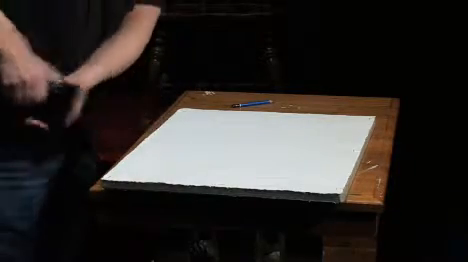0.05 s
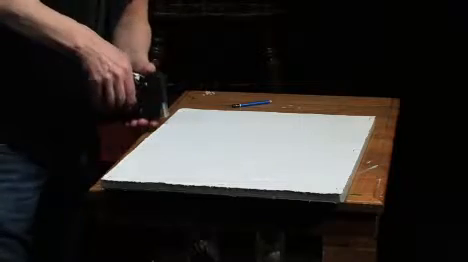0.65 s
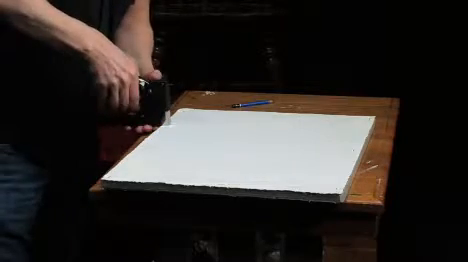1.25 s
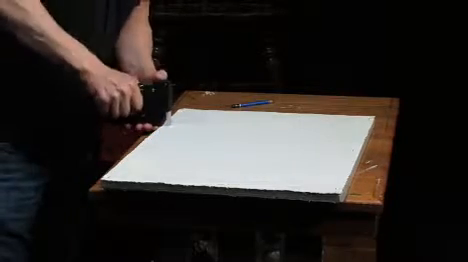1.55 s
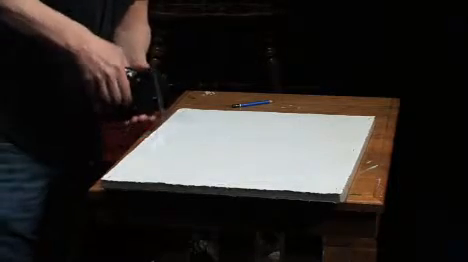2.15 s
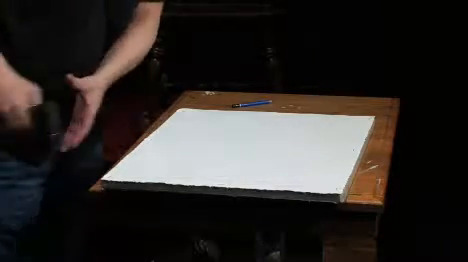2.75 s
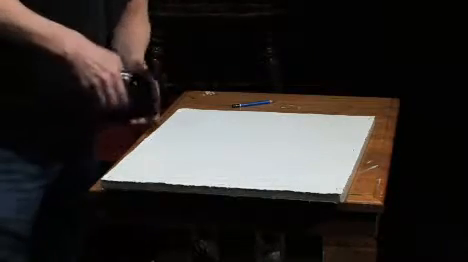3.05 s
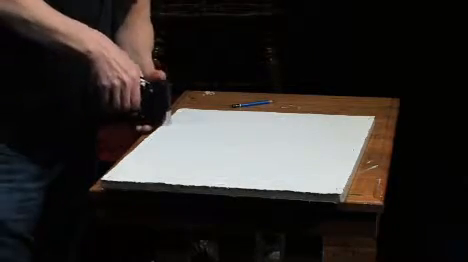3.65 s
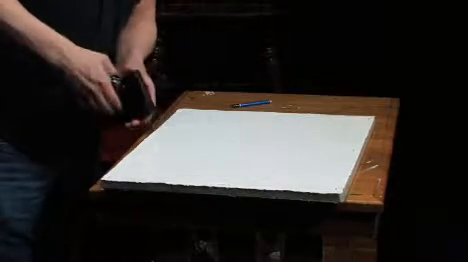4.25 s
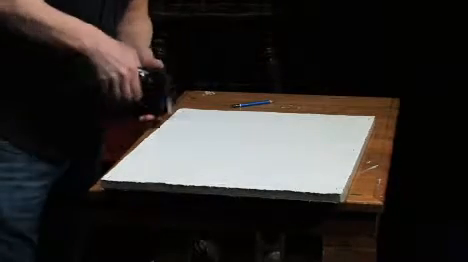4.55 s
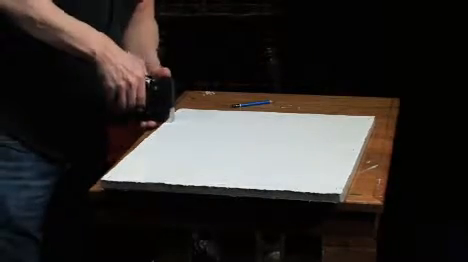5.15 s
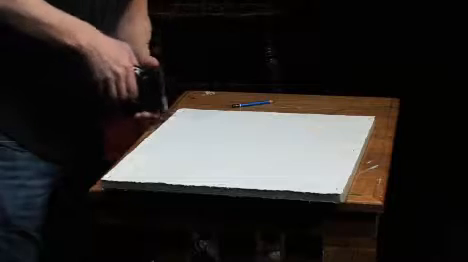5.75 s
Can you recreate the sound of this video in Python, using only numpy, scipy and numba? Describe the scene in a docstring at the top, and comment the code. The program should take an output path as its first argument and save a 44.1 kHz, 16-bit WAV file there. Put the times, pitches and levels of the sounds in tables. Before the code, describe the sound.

A hand staple gun fires five staples into a board with sharp metallic snaps, its lever clicking back after each, in a quiet room.

```python
"""A hand staple gun drives five staples through wet paper into a board on a wooden table.
A quiet, fairly live room hums and hisses. A faint hiss swells, then the catch slips with a click.
The spring slams the driver down, the steel frame rattles and the board and table knock.
A limiter ducks each snap, so the room's echo seems to swell up behind it.
Then the mechanism rebounds and the lever clicks back."""
import sys
import numpy as np
from scipy import signal
from scipy.fft import rfft, irfft
from scipy.io import wavfile
from numba import njit

SR = 44100
rng = np.random.default_rng(int(sys.argv[2]) if len(sys.argv) > 2 else 0)


def master_out(mix):
    """Clip the mix to full scale and print it as 16-bit PCM to the path in sys.argv[1]."""
    frames = np.transpose(np.atleast_2d(mix))
    ceiling = np.clip(frames, -1, 1)
    pcm = np.round(ceiling * 32767).astype(np.int16)
    wavfile.write(sys.argv[1], SR, pcm)


N = 255691
TOP_HZ, SHORT = 12000, 8192  # treble limit; samples in a short sound or filter


def undb(db):
    """Turn decibels into a number to multiply by."""
    return 10 ** (np.asarray(db) / 20)


def along(hz, points):
    """Read between (Hz, value) points, giving every octave the same width."""
    f, v = np.transpose(points)
    return np.interp(np.log(np.maximum(hz, 1)), np.log(f), v)


def add(track, s, x):
    """Mix x into the track, starting at s seconds."""
    i = int(s * SR)
    track[i:i + len(x)] += x[:len(track) - i]


def peak(s, rise_s, fall_s):
    """A loudness curve that grows to one at s seconds and dies away."""
    t = np.arange(N) / SR
    return np.exp(-np.maximum((s - t) / rise_s, (t - s) / fall_s))


def colour(x, points, tilt_db=0):
    """Give x a tone colour from (Hz, dB) points; a positive tilt, in dB per octave, brightens it."""
    hz = np.fft.rfftfreq(SHORT, 1 / SR)
    gain = undb(along(hz, points) + tilt_db * np.log2(np.clip(hz, 500, TOP_HZ) / 3000))
    gain /= np.sqrt(np.mean(gain ** 2 * (hz < TOP_HZ)))
    # build the filter so that nothing sounds before the hit that causes it
    cepstrum = irfft(np.log(gain))
    cepstrum[1:SHORT // 2] *= 2
    cepstrum[SHORT // 2 + 1:] = 0
    return signal.fftconvolve(x, irfft(np.exp(rfft(cepstrum))))[:len(x)]


def ring(x, modes):
    """Let x set fading notes ringing. Each note: pitch in Hz, seconds to fade 60 dB, share in dB."""
    t = np.arange(SHORT) / SR
    response = sum(undb(db) / np.sqrt(t60) * np.sin(2 * np.pi * hz * t) * np.exp(-np.log(1000) * t / t60)
                   for hz, t60, db in modes)
    return signal.fftconvolve(x, response / np.sqrt(np.sum(response ** 2)))[:len(x)]


def chatter(length_s, fall_s, rise_s):
    """Steel parts buzz against each other: dense tiny hits that last a while, then die away."""
    t = np.arange(SHORT) / SR
    fade = np.exp(-np.maximum(t - length_s, 0) / fall_s)
    impacts = rng.standard_normal(SHORT) * (1 - np.exp(-t / rise_s)) * fade
    return impacts * np.sqrt((length_s + fall_s / 2) * SR / np.sum(impacts ** 2))


# The tone of the room's air. Each row: frequency in Hz, relative level in dB.
AIR_COLOUR = [(20, -29.5), (40, -3), (58, 8), (80, -3), (150, 0), (210, -6.5), (280, -8), (450, -15),
              (1000, -21.5), (2000, -31), (4500, -37), (7200, -35), (10000, -42), (12000, -43)]

def room_tone(air_db=-56, hum_hz=58, hum_db=-62, swell_db=7.5):
    """Ventilation rumbles and hums under a thin hiss; it all swells with each squeeze, then sinks."""
    effort = sum(amount * peak(slip, rise_s=.5, fall_s=0.14) for slip, *_, amount in LEVER_SQUEEZES)
    hum = ring(rng.standard_normal(N), [(hum_hz, .45, 0), (156, .3, -4)])
    air = colour(rng.standard_normal(N), AIR_COLOUR)
    return undb(swell_db * effort) * (undb(air_db) * air + undb(hum_db) * hum)


# How long the echo lasts. Each row: frequency in Hz, seconds to fade by 60 dB.
ECHO_FADES = [(100, 0.43), (400, 0.45), (1500, 0.56), (4000, 0.45), (7500, 0.39), (12000, 0.31)]
# The tone of the echo. Each row: frequency in Hz, relative level in dB.
ECHO_COLOUR = [(60, -38), (300, -2), (1000, 1.5), (3000, 2), (5000, 4.5), (7200, 7.5), (9500, 6.5),
               (12000, 17.5)]

def room_echo(build_s=0.041, far_wall_s=0.071, far_wall_spread_s=0.0047, far_wall_share=0.25):
    """One second of echo: it builds up, swells as the far wall answers and fades, the treble first."""
    t = np.arange(SR) / SR
    hz = np.fft.rfftfreq(SR, 1 / SR)
    noise = rfft(rng.standard_normal(SR))
    centres, t60s = np.transpose(ECHO_FADES)
    tail = 0
    for share, t60 in zip(np.eye(len(centres)), t60s):
        band = irfft(noise * along(hz, np.c_[centres, share]), SR)
        tail = tail + band * np.exp(-np.log(1000) * t / t60)
    far_wall = far_wall_share * np.exp(-((t - far_wall_s) / far_wall_spread_s) ** 2)
    tail *= 1 - np.exp(-t / build_s) + far_wall
    # reflections arrive in uneven clumps a few milliseconds long
    tail *= undb(1.8 * np.interp(t, np.linspace(0, 1, 300), rng.standard_normal(300)))
    return colour(tail / np.sqrt(np.sum(tail ** 2)), ECHO_COLOUR)


# The spring sliding. Each row: loudest moment in seconds, spread in seconds, pitch in Hz, level in dB.
SPRING_SLIDES = [(4.31, 0.052, 6700, -65), (4.93, 0.053, 7220, -74)]

def faint_hisses(hiss_db=-57, lead_s=0.0036):
    """A faint hiss swells just before each catch click and dies quickly; the sliding spring hisses too."""
    swells = sum(peak(slip - lead_s, rise_s=0.045, fall_s=0.021) for slip, *_ in LEVER_SQUEEZES)
    out = undb(hiss_db) * swells * colour(rng.standard_normal(N), CRACK_COLOUR, tilt_db=-1.5)
    for s, spread, hz, db in SPRING_SLIDES:
        slide = np.exp(-((np.arange(N) / SR - s) / spread) ** 2 / 2)
        out += undb(db) * slide * ring(rng.standard_normal(N), [(hz, .003, 0)])
    return out


# The tone of a small click. Each row: frequency in Hz, relative level in dB.
CLICK_COLOUR = [(100, 20), (450, 0.5), (800, 5.5), (1400, 2.5), (2100, 5), (2600, -0.5), (3200, 3),
                (4300, -1.5), (6000, -0.5), (7400, 0), (9500, -4.5), (12000, -15.5)]
# The spring's notes. Each row: pitch in Hz, seconds to fade by 60 dB, share in dB.
SPRING_NOTES = [(7350, .04, -0.5), (7200, .012, -0.5), (6850, .01, -13.5)]

def click(length_s, ring_hz, tilt_db, ring_db, ping_db, ring_s=0.011):
    """A small steel part chatters, rings at its own pitch and sets the spring pinging."""
    rattle = chatter(length_s, fall_s=0.0021, rise_s=0.0003)
    part = undb(ring_db) * ring(rattle, [(ring_hz, ring_s, 0)])
    ping = undb(ping_db) * ring(rattle, SPRING_NOTES)
    return colour(rattle, CLICK_COLOUR, tilt_db) + part + ping


# Light ticks. Each row: start in seconds, level in dB, tilt in dB per octave, pitch in Hz.
GRIP_TICKS = [(0.446, -46, -9, 1000), (0.709, -57, -1.5, 3720), (1.8645, -45.5, -2, 2085),
              (2.41, -57, -5, 2170), (2.48, -52, 5, 2200), (3.0903, -56, 0.5, 3180),
              (3.4315, -40.5, -12, 756), (4.5403, -51.5, -1, 4600)]

def grip():
    """Loose parts tick as the hands shift on the gun."""
    out = np.zeros(N)
    for s, db, tilt_db, hz in GRIP_TICKS:
        add(out, s, undb(db) * click(0.0022, hz, tilt_db, ring_db=-4, ping_db=-30.5, ring_s=0.0044))
    return out


# The rebound after each staple. Each row: start in seconds, level in dB, length in seconds,
# pitch in Hz, then the ring and the spring's ping, both in dB compared with that level.
REBOUND_CLICKS = [(0.3145, -33.5, 0.0016, 1830, -2, -9), (1.754, -47, 0.005, 1480, 0, -25),
                  (2.726, -33, 0.0018, 2000, 0.5, -19), (4.099, -42, 0.0056, 1580, -22, -13),
                  (5.495, -36.5, 0.0023, 1520, -0.5, -11.5)]
# The lever hitting its stop. Each row: start in seconds, level in dB, length in seconds, pitch in Hz,
# ring in dB, seconds until the bounce, bounce in dB. Ring and bounce are compared with the level.
LEVER_RETURNS = [(0.4713, -31, 0.0061, 2200, -20, .023, -16.5),
                 (1.8982, -45.5, 0.0011, 3230, -0.5, .021, -3.5),
                 (2.3204, -42.5, 0.0017, 3395, -10, .026, -15), (2.8294, -31, 0.0064, 2120, -9, 0.011, -17),
                 (4.172, -38, 0.0027, 1600, -4, .015, -6.5), (5.554, -33, 0.0081, 1350, -11, 0.0076, -14)]

def release():
    """The mechanism rebounds; the lever swings back, hits its stop and bounces once."""
    out = np.zeros(N)
    for s, db, length, hz, ring_db, ping_db in REBOUND_CLICKS:
        add(out, s, undb(db) * click(length, hz, tilt_db=4.5, ring_db=ring_db, ping_db=ping_db))
    for s, db, length, hz, ring_db, bounce_s, bounce_db in LEVER_RETURNS:
        add(out, s, undb(db) * click(length, hz, tilt_db=0.7, ring_db=ring_db, ping_db=-18.5))
        bounce = click(length_s=0.0024, ring_hz=3160, tilt_db=1.5, ring_db=-5.5, ping_db=-17.5)
        add(out, s + bounce_s, undb(db + bounce_db) * bounce)
    return out


# The squeeze before each staple. Each row: when the catch slips in seconds, level in dB, pitch in Hz,
# ring in dB compared with that level, effort from 0 to 1 (how much the background swells).
LEVER_SQUEEZES = [(0.1002, -24, 3000, -3, 0.75), (1.5118, -25, 3500, -6.5, .85),
                  (2.5123, -26, 1620, 0, 0.1), (3.8723, -25.5, 3400, -8.5, 0.67),
                  (5.2984, -28, 2910, -9.5, 1)]

def catch(creep_s=.003, creep_db=-9, scrape_db=-37):
    """The catch creeps, then slips; the spring scrapes free halfway to the shot."""
    out = np.zeros(N)
    for (slip_s, db, hz, ring_db, _), (shot_s, *_) in zip(LEVER_SQUEEZES, STAPLE_SHOTS):
        creep = click(length_s=0.0015, ring_hz=hz, tilt_db=5.5, ring_db=-9.5, ping_db=-21)
        slip = click(length_s=0.0022, ring_hz=hz, tilt_db=1.9, ring_db=ring_db, ping_db=-13, ring_s=.012)
        scrape = click(length_s=.0036, ring_hz=5400, tilt_db=11, ring_db=-7.5, ping_db=-16)
        add(out, slip_s - creep_s, undb(db + creep_db) * creep)
        add(out, slip_s, undb(db) * slip)
        add(out, (slip_s + shot_s) / 2, undb(scrape_db) * scrape)
    return out


def small_clicks(low_cut_hz=560, near_fall_s=0.017):
    """The metal clicks around each staple, from parts too small to give off bass."""
    bass_cut = signal.butter(3, low_cut_hz, "high", fs=SR, output="sos")
    clicks = signal.sosfilt(bass_cut, catch() + release() + grip())
    # table and body scatter the clicks at once; the walls add little
    near = rng.standard_normal(SHORT) * np.exp(-np.arange(SHORT) / SR / near_fall_s)
    scattered = signal.fftconvolve(clicks, near / np.sqrt(np.sum(near ** 2)))[:N]
    echo = signal.fftconvolve(clicks, room_echo())[:N]
    return clicks + undb(-11.5) * scattered + undb(-25.5) * echo


def table_thump(push_s=0.005, fall_s=0.006, start_hz=380, end_hz=58, glide_s=0.0042):
    """The recoil sends a bending wave through the table; low notes travel slowest, so the pitch sags."""
    t = np.arange(SHORT) / SR
    hz = end_hz + (start_hz - end_hz) * np.exp(-t / glide_s)
    envelope = (1 - np.exp(-t / push_s)) * np.exp(-t / fall_s)
    return -2 * np.sin(2 * np.pi * np.cumsum(hz) / SR) * envelope


# The tones of the sharp crack and the board's dull knock. Each row: frequency in Hz, relative level in dB.
CRACK_COLOUR = [(100, -25), (500, -1.5), (1000, -3), (2000, -1.5), (3000, -3.5), (3500, -2), (5000, -2.5),
                (6200, -0.5), (7300, 1.5), (9000, -3.5), (10500, -10.5), (12000, -23.5)]
KNOCK_COLOUR = [(60, 16.5), (150, -4.5), (250, -15.5), (380, 4), (600, -2), (900, -13.5), (2000, -31),
                (6000, -43)]
# The notes of the steel frame and the board. Each row: pitch in Hz, seconds to fade by 60 dB, share in dB.
FRAME_NOTES = [(1330, 0.12, 8), (1555, 0.013, 15.5), (2084, .03, -12.5), (2250, 0.031, 6), (2800, 0.078, 5),
               (2970, 0.019, 8.5), (3146, 0.016, 21), (3915, 0.02, 12.5), (4020, 0.085, -6.5),
               (4540, 0.038, -28.5), (6450, .04, -33.5), (7300, 0.081, 8), (7500, 0.092, -6.5),
               (7450, 0.14, -3), (8150, .05, -7.5)]
BOARD_NOTES = [(195, 0.1, -13.5), (356, 0.079, -2.5), (397, 0.052, 5.5), (532, 0.033, 1), (632, 0.046, -15),
               (806, 0.14, -5), (1240, 0.054, 0.5)]
# The five staples. Each row: start in seconds, level in dB, rattle length in seconds, contact with the
# board from 0 (loose) to 1 (firm), frame pitch in Hz, board pitch in Hz, knock in dB compared with
# the level, then the thump's and the echo's own levels in dB.
STAPLE_SHOTS = [ (0.1127, -4.5, .0098, 0, 2850, 623, -9.5, -24, -23.5),
                (1.5580, -21.5, 0.006, 0.44, 3250, 680, -4.5, -24, -26.5),
                (2.5235, -8, .011, 0, 3820, 703, -5, -12.5, -24),
                (3.9046, -22.5, 0.0051, 0.63, 2750, 710, -22, -23.5, -24),
                (5.3265, -13, 0.0056, 0.78, 2780, 808, -11, -35, -26)]

def staples(travel_s=.003, seat_s=0.0031):
    """The frame rattles as the driver flies, seats the staple, knocks the board and thumps the table."""
    out = np.zeros(N)
    for s, db, length, contact, frame_hz, board_hz, knock_db, thump_db, room_db in STAPLE_SHOTS:
        # firm contact dulls the crack and makes frame and board ring louder
        tilt_db = 0.53 - 3 * contact
        frame_db, board_db = -17 + 18 * contact, -20.5 + 23.5 * contact
        strike = np.zeros(SR)
        add(strike, travel_s, chatter(seat_s, fall_s=0.0027, rise_s=.0003))
        buzz = np.pad(chatter(length, fall_s=0.0065, rise_s=.0004), (0, SR - SHORT))
        rattle = strike + undb(-0.5) * buzz
        force = np.sqrt(np.sum(rattle ** 2))
        blow = force * signal.unit_impulse(SR, int(travel_s * SR))
        # the gun moves between staples, so each one finds other paths through the room
        echo = undb(room_db - db) * force * room_echo()
        # the staple adds a very high zip as it shears off the strip
        shear = undb(-13.5) * ring(rattle, [(10800, 0.0032, 0)])
        crack = colour(rattle + echo, CRACK_COLOUR, tilt_db) + shear
        frame = ring(rattle + undb(-6.5) * echo, FRAME_NOTES)
        frame += undb(-2.5) * ring(strike, [(frame_hz, .005, 0)])
        # one of the board's notes depends on where the gun is pressed down
        board = ring(blow + undb(1.5) * echo, BOARD_NOTES + [(board_hz, .02, 3)])
        knock = colour(strike + undb(-17) * echo, KNOCK_COLOUR)
        knock += ring(blow, [(board_hz, .008, 0), (340, .016, 0)])
        snap = crack + undb(frame_db) * frame + undb(board_db) * board + undb(knock_db) * knock
        add(out, s, undb(db) * snap)
        add(out, s, undb(thump_db) * table_thump())
    return out


def scene():
    """Gun, table and room as heard from across the table."""
    return (staples() + small_clicks() + faint_hisses() + room_tone())[None]


@njit
def follow(x, rise, fall):
    """Track how loud x is, closing a share of the gap each sample: rise going up, fall going down."""
    out, level = np.empty(len(x)), 0.
    for i in range(len(x)):
        level += (abs(x[i]) - level) * (rise if abs(x[i]) > level else fall)
        out[i] = level
    return out


def record(dry, ceiling_db=-15.5, attack_s=.0003, release_s=0.012, ahead_s=.0008, low_cut_hz=35):
    """The microphone sheds the deepest bass; a fast limiter briefly ducks each snap; the top is cut."""
    x = signal.sosfilt(signal.butter(2, low_cut_hz, "high", fs=SR, output="sos"), dry)
    level = follow(x[0], 1 - np.exp(-1 / (attack_s * SR)), 1 - np.exp(-1 / (release_s * SR)))
    t = np.arange(N) / SR
    coming_level = np.interp(t + ahead_s, t, level)
    gain = 1 / np.maximum(1, coming_level / undb(ceiling_db))
    return signal.sosfilt(signal.ellip(10, .2, 70, TOP_HZ, fs=SR, output="sos"), x * gain)


dry = scene()
out = record(dry)
master_out(out)
```